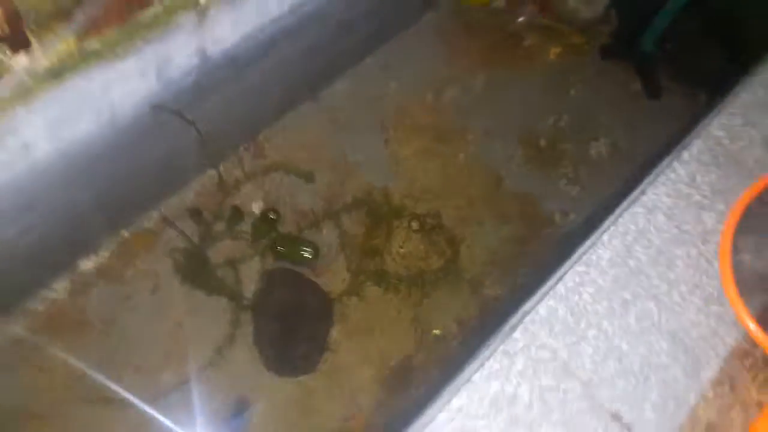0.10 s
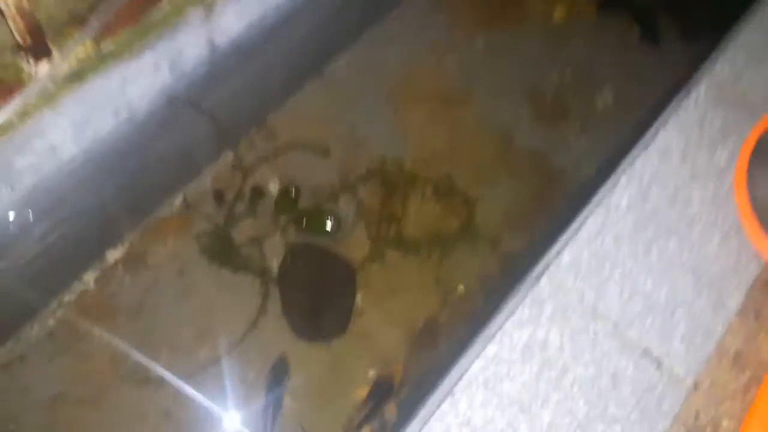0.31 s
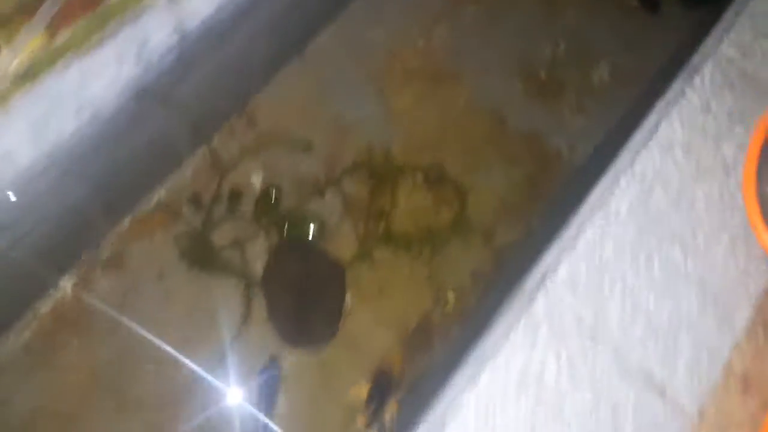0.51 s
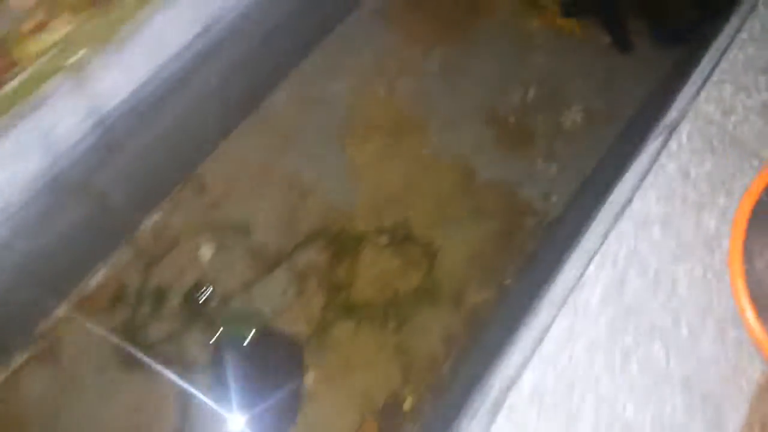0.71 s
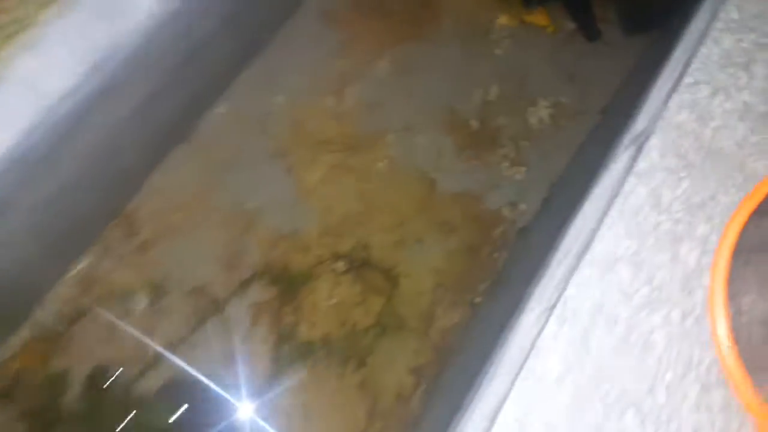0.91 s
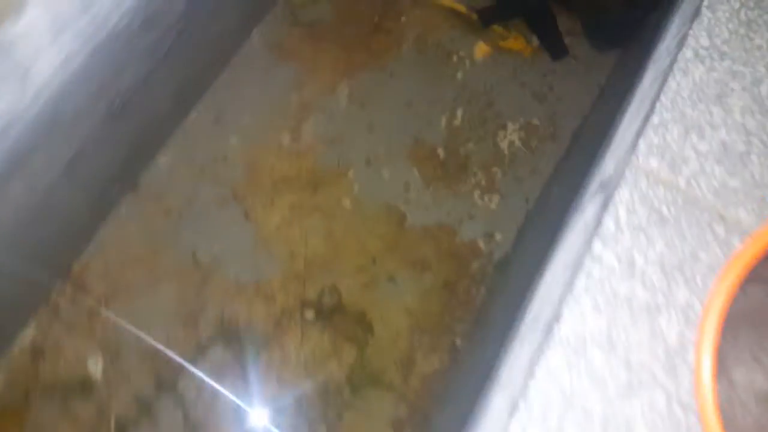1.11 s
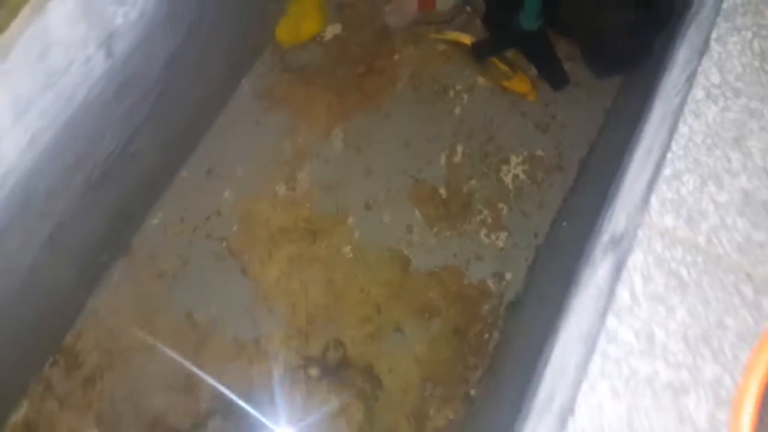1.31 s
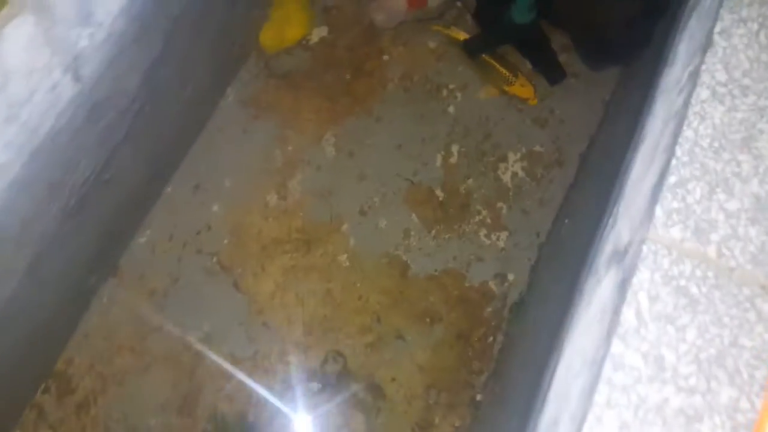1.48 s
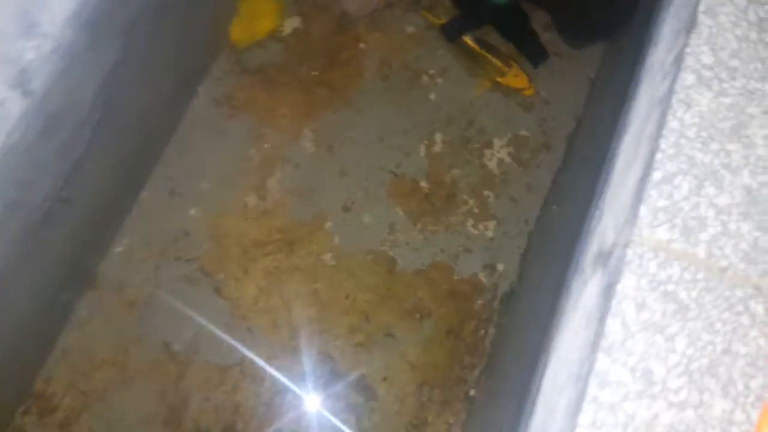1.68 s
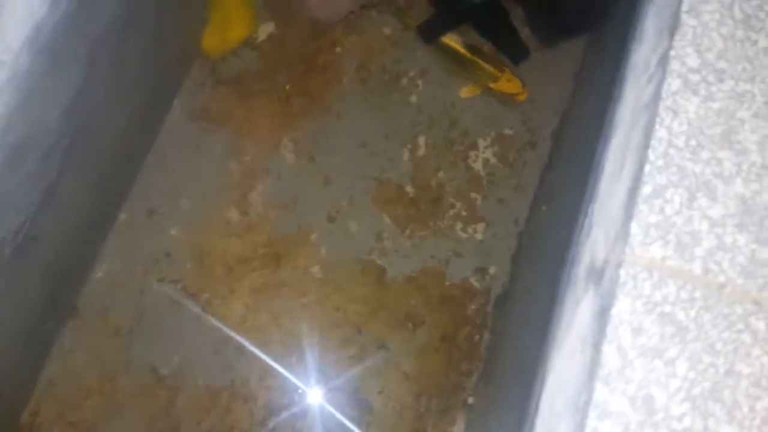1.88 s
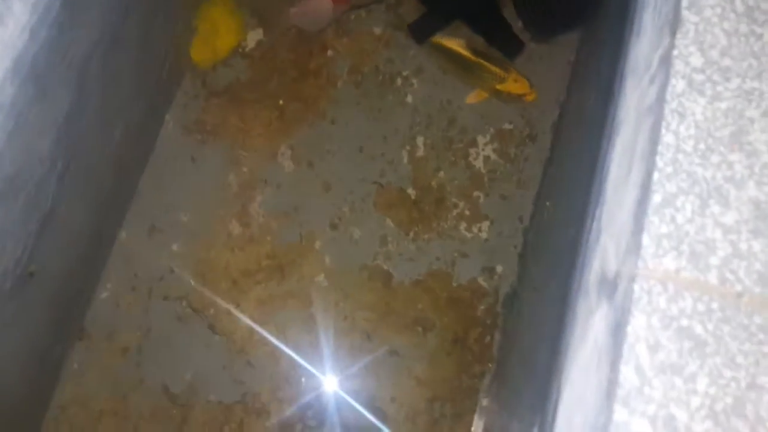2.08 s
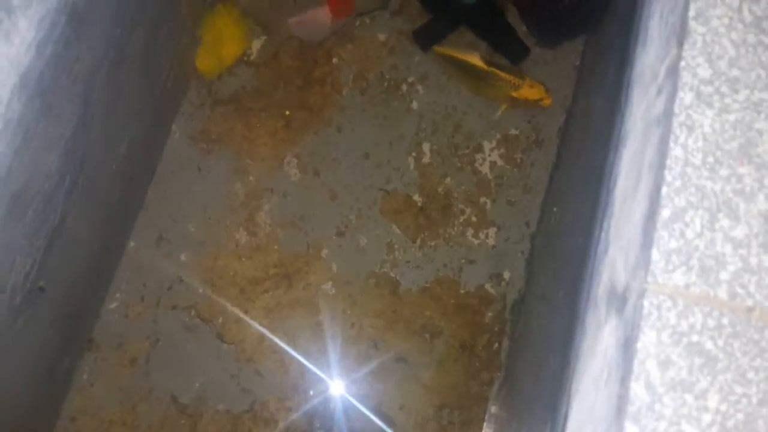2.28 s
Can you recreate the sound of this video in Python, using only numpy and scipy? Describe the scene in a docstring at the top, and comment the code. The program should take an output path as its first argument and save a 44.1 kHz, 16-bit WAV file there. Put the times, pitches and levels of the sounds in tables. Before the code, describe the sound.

A pump drones low in a shallow fish tank, water bubbling, with one heavy knock early

```python
"""Fish tank with a filter pump, heard indoors

A filter pump runs in a shallow fish tank: a low noise drone with faint hum lines, a dull wash of
shaped noise, and bubbles made as damped rings that rise in pitch. Soft knocks ring a low boom and hard
little taps ring the damped body; one knock near the start is heavy, two near the end come with scuffs.
The sound at the microphone is muffled, with little above 3.5 kHz but faint hiss."""
import sys
import numpy as np
from scipy import signal
from scipy.fft import rfft, irfft, next_fast_len
from scipy.io import wavfile
from scipy.ndimage import uniform_filter1d, map_coordinates

SR = 44100
rng = np.random.default_rng(int(sys.argv[2]) if len(sys.argv) > 2 else 0)


def inscribe(sig):
    """Save sig as 16-bit PCM at rate SR to the path in sys.argv[1].

    A 1-D sig is mono; a 2-D sig holds one channel per row.
    Samples are clipped to [-1, 1] before scaling.
    """
    pcm = np.round(np.clip(np.atleast_2d(sig).T, -1, 1) * 32767)
    wavfile.write(sys.argv[1], SR, pcm.astype(np.int16))


N = 108045  # length in samples
LOW_CUT_HZ = 104  # high-pass on knocks and taps


def amp(db):
    """Amplitude factor for a level in dB."""
    return 10 ** (np.asarray(db) / 20)


def unit(x):
    """x scaled to an rms of 1."""
    return x / np.sqrt(np.mean(x ** 2) + 1e-20)


def along(points, hz):
    """Values at hz, read between (Hz, value) points on a log frequency axis."""
    f, v = np.transpose(points)
    return np.interp(np.log(hz + 1), np.log(f + 1), v)


def wobble(rate):
    """A smooth random curve through rate knots a second."""
    knots = rng.standard_normal(int(N * rate / SR) + 4)
    return map_coordinates(knots, [np.arange(N) * rate / SR])


def filtered(x, response):
    """x passed through a complex response given as a function of frequency."""
    m = next_fast_len(len(x) + SR // 2)
    return irfft(rfft(x, m) * response(np.fft.rfftfreq(m, 1 / SR)), m)[:len(x)]


def cut(x, hz, kind, order):
    """Causal low-pass or high-pass."""
    sos = signal.butter(order, min(hz, SR / 2 - 1), kind, fs=SR, output="sos")
    return signal.sosfilt(sos, x)


def noise(spectrum, patchy_db):
    """Coloured noise of rms 1 whose gain varies in patches of time and frequency."""
    z = signal.stft(rng.standard_normal(N), nperseg=512)[2]
    field = rng.standard_normal(z.shape)
    for axis in (0, 1):
        field = uniform_filter1d(field, size=5, axis=axis)
    patchy = signal.istft(z * amp(patchy_db * unit(field)), nperseg=512)[1][:N]
    return unit(filtered(patchy, lambda hz: amp(along(spectrum, hz))))


def swell(s, db, rise, t60):
    """Envelope: a smooth rise up to time s, then a decay of 60 dB in t60 seconds."""
    t = np.arange(N) / SR - s
    decay = amp(db - 60 * np.maximum(t, 0) / t60)
    return decay * np.exp(-(np.minimum(t, 0) / rise) ** 2)


def add(track, s, db, sound):
    """Place a sound at time s with the given peak level."""
    part = track[max(round(s * SR), 0):][:len(sound)]
    part += amp(db) * sound[:len(part)] / np.abs(sound).max()


def in_room(x, wet_db):
    """The sound plus the room's short tail: noise that dies away sooner in the treble."""
    # Reverberation of the room. Each row: frequency in Hz, time to fall 60 dB in s.
    room = [(100, 0.41), (1000, 0.14), (5000, 0.045)]
    hz, t, z = signal.stft(rng.standard_normal(SR // 2), SR, nperseg=256)
    fade = amp(-60 * t / along(room, hz)[:, None])
    tail = signal.istft(z * fade, SR, nperseg=256)[1]
    return x + amp(wet_db) * signal.fftconvolve(x, tail / np.linalg.norm(tail))[:N]


def pump(level_db):
    """The pump's low noise drone, with a few faint hum lines of wandering phase."""
    # Colour of the drone. Each row: frequency in Hz, relative level in dB.
    drone_colour = [(20, -44.5), (35, 0), (60, -1), (125, -1), (200, -1), (280, -9.5), (450, -20.5),
                    (900, -74)]
    # Hum lines of the pump. Each row: frequency in Hz, rms level in dB.
    hum_lines = [(138, -54), (366, -62), (602, -68.5), (755, -73)]
    t = np.arange(N) / SR
    hum = np.zeros(N)
    for hz, db in hum_lines:
        phase = 2 * np.pi * hz * t + 1.27 * wobble(5.65)
        hum += amp(db) * np.sqrt(2) * np.sin(phase)
    gain = amp(level_db + 0.5 + 1.4 * wobble(25))
    return hum + gain * noise(drone_colour, patchy_db=2.5)


def water(wash_db, splash_db):
    """Moving water: a dull noise wash, and patchy noise above it that crackles by fast gain swings."""
    # Colours of the low wash and of the splashing. Each row: frequency in Hz, relative level in dB.
    wash_colour = [(130, -30), (270, -3.5), (370, -2.5), (520, -2.5), (760, -4), (950, -10.5),
                   (1400, -24.5), (3000, -71.5)]
    splash_colour = [(500, -25.5), (1000, 0), (1400, 0.5), (1900, -2.5), (2300, -11), (2950, -12),
                     (3350, -19), (3700, -26.5), (5000, -36), (7500, -51.5)]
    wash = amp(wash_db + 0.3 * wobble(5.7)) * noise(wash_colour, patchy_db=1.46)
    crackle = unit(amp(1.6 * wobble(260)) * noise(splash_colour, patchy_db=2.5))
    return wash + amp(splash_db - 2.5 + 0.34 * wobble(26)) * crackle


def bubble(hz, cycles):
    """A damped ring that rises in pitch; it falls 60 dB over the given cycles."""
    pitch_rise, attack_s = 0.046, 0.00051  # pitch gain as a fraction over its life; soft start
    life = cycles / hz
    t = np.arange(int(life * SR)) / SR
    ring = np.sin(2 * np.pi * hz * t * (1 + pitch_rise * t / life / 2))
    return ring * amp(-60 * t / life) * (1 - np.exp(-t / attack_s))


def bubbles(splash_db):
    """Each splash rings one bubble among muffled droplets; many small bubbles follow the splashing level."""
    # Splashes with a clear bubble. Each row: start in s, peak level in dB before the room,
    # starting pitch in Hz, cycles to fall 60 dB.
    splashes = [(0.071, -45.5, 1650, 23), (0.358, -47.5, 2280, 50), (0.554, -63, 4230, 36),
                (0.599, -41, 1870, 28), (.6170, -66, 4750, 56), (0.6448, -44.5, 1384, 39),
                (0.7425, -60, 2700, 42), (1.0210, -55.5, 2320, 28), (1.3097, -50, 2040, 60),
                (1.3388, -46.5, 1650, 18), (1.421, -53, 2200, 30), (1.5434, -43, 2020, 20),
                (1.5620, -54, 2800, 30), (1.736, -45, 1780, 33), (1.783, -44, 2270, 22),
                (1.802, -51, 2820, 45), (1.834, -42, 1816, 29), (1.835, -49, 2730, 21),
                (1.839, -56.5, 3426, 160), (1.9092, -45.5, 1760, 32), (1.9040, -60, 3400, 110),
                (1.9320, -56, 2830, 40), (1.938, -46.5, 1870, 35), (2.058, -44.5, 2010, 37),
                (2.1816, -51.5, 2740, 45), (2.4000, -53, 2540, 120)]
    # Droplets: level in dB against the bubble, scatter in s and in log pitch, cycles to fall 60 dB.
    spray_db, spray_s, spray_spread, droplet_cycles = -8, 0.0083, 0.29, 10
    # Small bubbles: number a second, middle pitch in Hz, octaves either side, cycles to fall 60 dB.
    fizz_per_s, fizz_hz, fizz_octaves, fizz_cycles = 130, 1959, 0.706, 31
    clear, small = np.zeros(N), np.zeros(N)
    for s, db, hz, cycles in splashes:
        add(clear, s, db, bubble(hz, cycles))
        for u, v, w in rng.uniform(-1.1, 1, size=(5, 3)):
            droplet = bubble(hz * np.exp(spray_spread * w), droplet_cycles)
            add(small, s + spray_s * (u + 0.5) / 2, db + spray_db + 3 * v, droplet)
    for u, v, w in rng.random((int(fizz_per_s * N / SR), 3)):
        at = int(u * (N - 1))
        octaves = fizz_octaves * (2 * w - 1)
        db = splash_db[at] - 10 * v - 7 * octaves  # higher ones are softer
        add(small, at / SR, db, bubble(fizz_hz * 2 ** octaves, fizz_cycles))
    return clear + cut(small, 3230, "low", order=8)


def knocks():
    """A soft blow sets off a low boom and a weaker overtone, each a damped resonance."""
    # Soft knocks. Each row: start in s, peak level in dB before the room, boom pitch in Hz,
    # boom Q, contact brightness (low-pass) in Hz.
    knock_list = [(0.019, -21, 130, 4.1, 336), (0.1051, -21, 58, 4.9, 705), (0.1453, -15.5, 103, 1.17, 469),
                  (.2148, -.6, 79, 1.76, 720), (0.3141, -27.5, 95.6, 3.5, 199), (0.51, -33, 85.5, 2, 304),
                  (0.623, -31, 99, 2.7, 200), (.8600, -35.5, 72, 2.7, 201), (1.0560, -36, 82, 3.4, 220),
                  (1.2650, -33.5, 171, 1.2, 520), (1.3719, -32.5, 159, 1.2, 515),
                  (1.8060, -30.5, 132, 1.9, 298), (2.09, -26, 62, 4, 220), (2.1470, -22, 66, 1.5, 260),
                  (2.1580, -19, 66, 2.2, 115), (2.1990, -20.5, 66, 1.9, 105), (2.404, -32, 166, 5.7, 352)]
    overtone_ratio, overtone_q, overtone_db = 2.23, 1.95, -20

    def mode(f, hz, q):
        return 1 / (1 - (f / hz) ** 2 + 1j * f / (hz * q))

    out = np.zeros(N)
    for s, db, boom_hz, q, bright_hz in knock_list:
        def boom_and_overtone(f):
            overtone = mode(f, overtone_ratio * boom_hz, overtone_q)
            return mode(f, boom_hz, q) + amp(overtone_db) * overtone

        push = cut(-signal.unit_impulse(SR // 4), bright_hz, "low", order=4)
        boom = filtered(push, boom_and_overtone)
        add(out, s, db, cut(boom, LOW_CUT_HZ, "high", order=4))
    return out


def taps():
    """A short contact rings the heavily damped body; harder contact is brighter."""
    # Hard taps. Each row: start in s, peak level in dB before the room, contact brightness (low-pass) in Hz.
    tap_list = [(0.1058, -27.5, 3300), (0.1663, -11.5, 1860), (0.3516, -33, 1300), (.6003, -37, 2100),
                (1.0660, -35.5, 560), (1.0870, -35.5, 1790), (1.1030, -40, 1890), (1.1177, -39, 1600),
                (1.1432, -31.5, 1550), (1.1733, -32, 1690), (1.2644, -26.5, 1590), (1.3722, -31.5, 990),
                (1.5114, -33, 945), (1.524, -36, 1200), (1.7230, -26.5, 860), (1.7389, -29, 870),
                (1.9200, -28, 770)]
    # Resonances of the tapped body. Each row: centre in Hz, width in Hz, level in dB.
    resonances = [(151, 230, -8), (377, 131, 8), (1126, 295, 2), (1570, 1300, -12.5), (2760, 910, -12.5)]

    def body(f):
        return sum(amp(db) * 1j * f * w / (c * c - f * f + 1j * f * w) for c, w, db in resonances)

    out = np.zeros(N)
    for s, db, bright_hz in tap_list:
        push = cut(signal.unit_impulse(SR // 8), bright_hz, "low", order=5)
        add(out, s, db, cut(filtered(push, body), LOW_CUT_HZ, "high", order=2))
    return out


def scuffs():
    """Brief rubbing noises, most of them along with a knock, made gritty by fast gain swings."""
    # Scuffs and swishes. Each row: time of the top in s, rms level there in dB, rise in s,
    # time to fall 60 dB in s.
    scuff_list = [(0.1063, -37, 0.0011, 0.094), (0.249, -32, 0.011, 0.09), (0.351, -39.5, 0.0038, 0.073),
                  (1.9150, -40.5, 0.029, 0.14), (2.1550, -28.5, 0.003, 0.024), (2.197, -32, 0.003, 0.055)]
    # Colour of the rubbing. Each row: frequency in Hz, relative level in dB.
    scuff_colour = [(100, -13.5), (350, 4), (700, -2), (1300, -7.5), (2000, -15.5), (2800, -20.5),
                    (3800, -37), (5500, -53), (7500, -71)]
    grit = unit(amp(0.97 * wobble(450)) * noise(scuff_colour, patchy_db=1.5))
    return sum(swell(*row) for row in scuff_list) * grit


def slosh():
    """A hissy noise wash follows the heavy knock and dies away."""
    # Colour of the slosh. Each row: frequency in Hz, relative level in dB.
    slosh_colour = [(500, -17), (1200, -5.5), (2600, -0.5), (3400, -9.5), (3900, -18.5), (5000, -23.5),
                    (6000, -36.5), (9000, -45)]
    return swell(s=0.217, db=-53.5, rise=0.003, t60=1) * noise(slosh_colour, patchy_db=1.2)


def hiss(level_db):
    """Faint noise in the far treble, without patches."""
    # Colour of the hiss. Each row: frequency in Hz, relative level in dB.
    hiss_colour = [(2000, 2), (5000, -3.5), (6500, -1.5), (8000, -8.5), (10000, -1.5), (12000, 2),
                   (15500, 4)]
    even = filtered(rng.standard_normal(N), lambda hz: amp(along(hiss_colour, hz)))
    return amp(level_db + 5.5) * unit(even)


def scene():
    """Pump, water, knocks and hiss at one microphone."""
    # Course of the steady layers, before each layer's own trim. Each row: time in s, level of the drone,
    # of the low wash, of the splashing and of the hiss, all in dB.
    levels = [(0.06, -37, -47.5, -51, -80.5), (0.191, -42.5, -48, -51.5, -83),
              (0.35, -44, -50.5, -57.5, -90), (0.55, -50.5, -50, -55, -88.5),
              (0.761, -50, -55.5, -59.5, -91.5), (1.02, -49, -55, -61.5, -92),
              (1.3, -48.5, -52, -60.5, -92), (1.66, -44, -48, -55.5, -87.5), (1.9, -42, -42.5, -54, -86.5),
              (2.1, -39, -42, -51, -86), (2.439, -44, -43.5, -50, -85.5)]
    s, *columns = np.transpose(levels)
    t = np.arange(N) / SR
    drone_db, wash_db, splash_db, hiss_db = [np.interp(t, s, c) for c in columns]
    bed = pump(drone_db) + water(wash_db, splash_db) + hiss(hiss_db)
    blows = in_room(knocks(), wet_db=-26) + in_room(taps(), wet_db=-20)
    rubs = scuffs() + slosh()
    return (bed + blows + rubs + in_room(bubbles(splash_db), wet_db=-5.5))[None]


def record(dry):
    """The recorder keeps nothing above its band limit."""
    top_hz = 15750
    return filtered(dry[0], lambda hz: hz < top_hz)[None]


dry = scene()
out = record(dry)
inscribe(out)
```